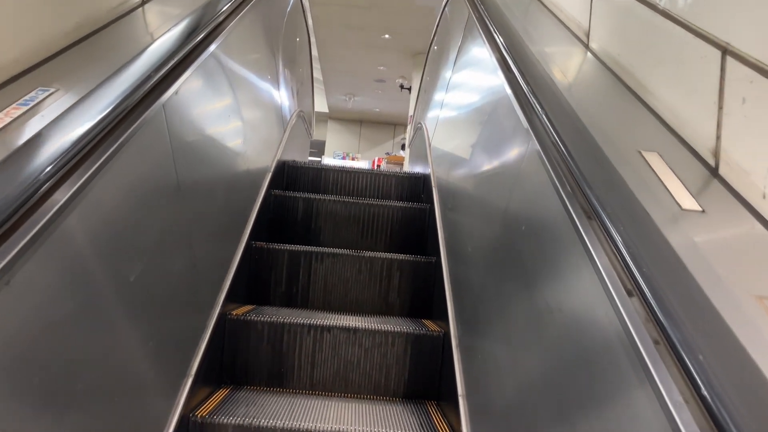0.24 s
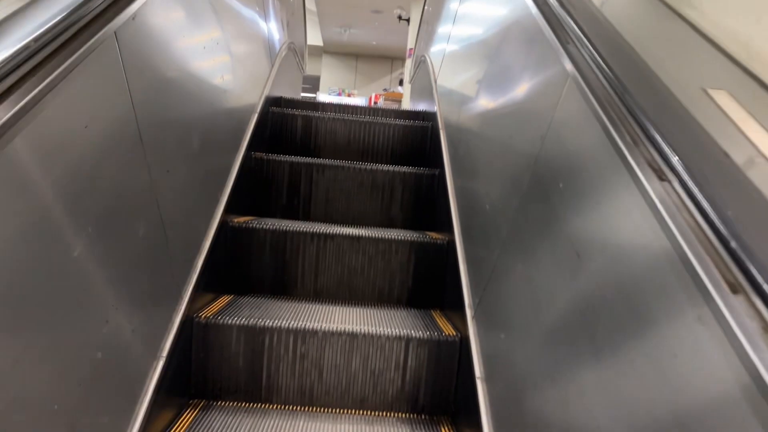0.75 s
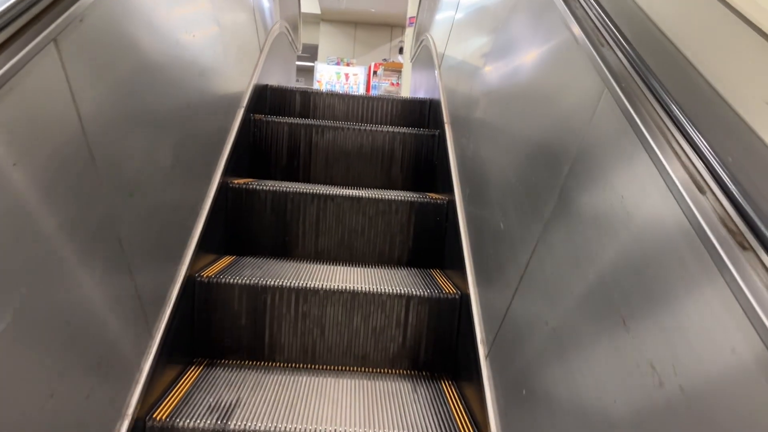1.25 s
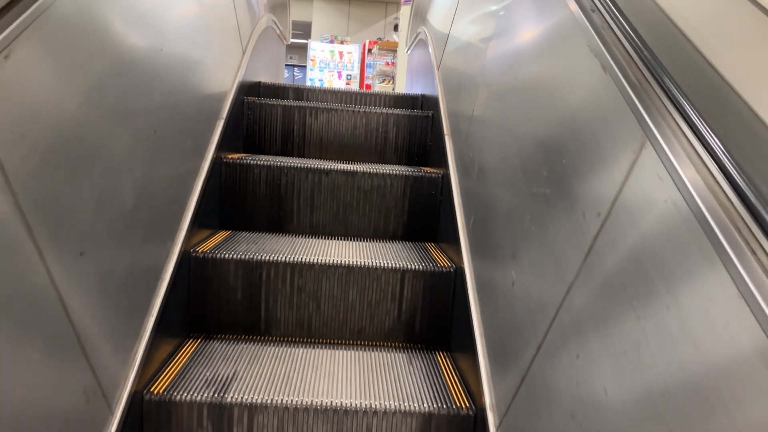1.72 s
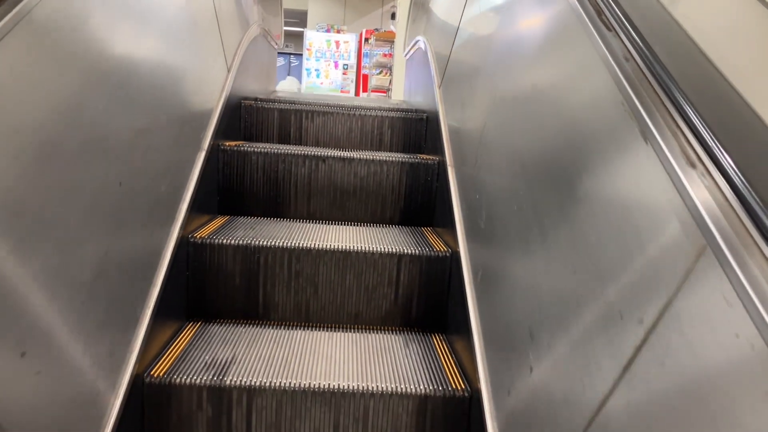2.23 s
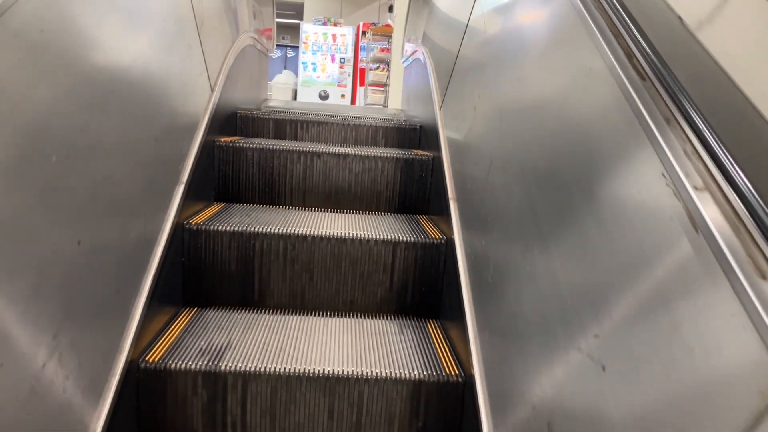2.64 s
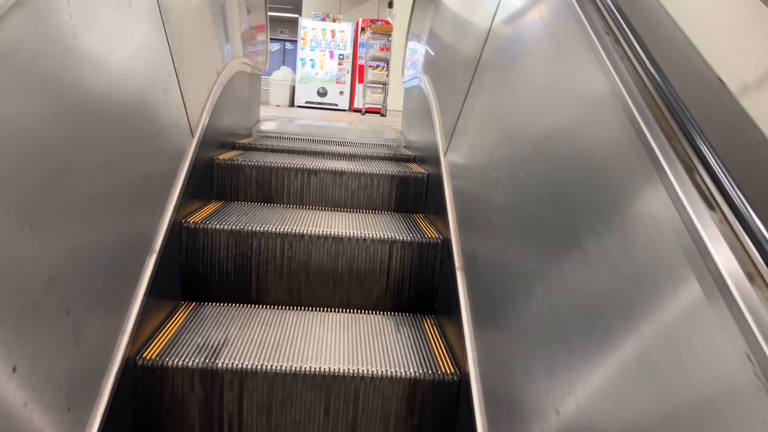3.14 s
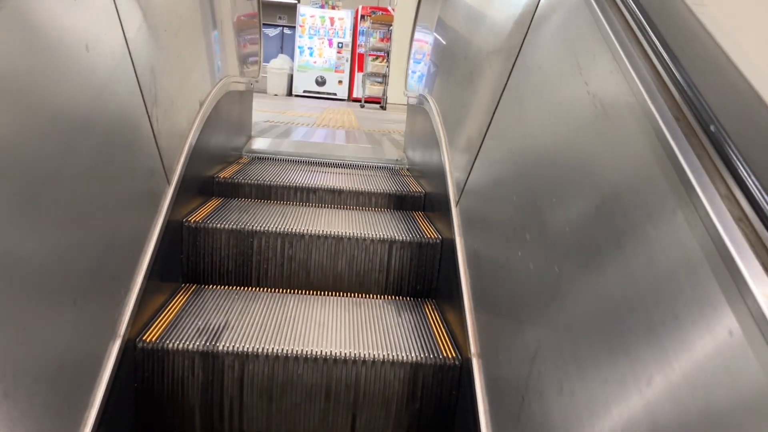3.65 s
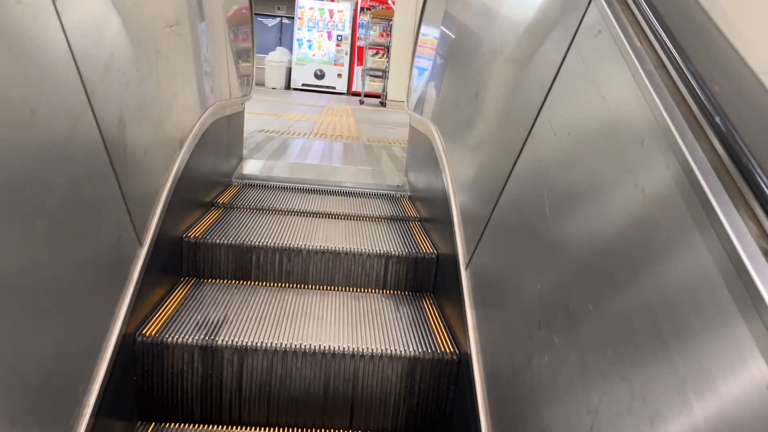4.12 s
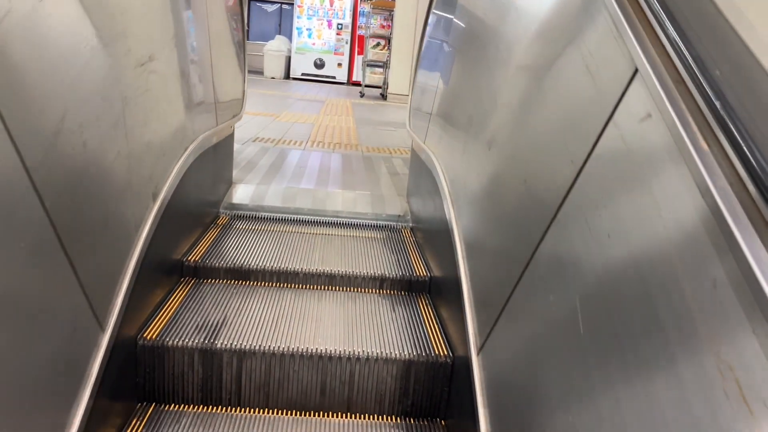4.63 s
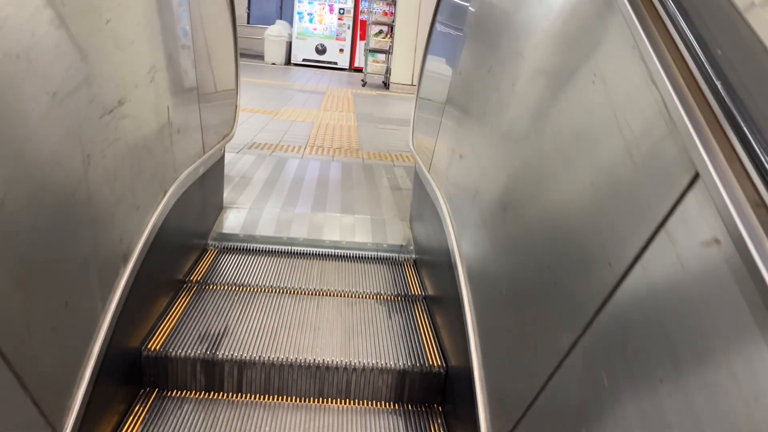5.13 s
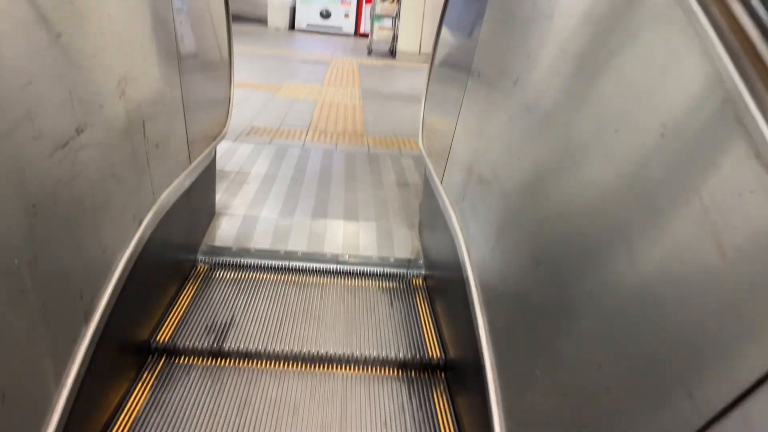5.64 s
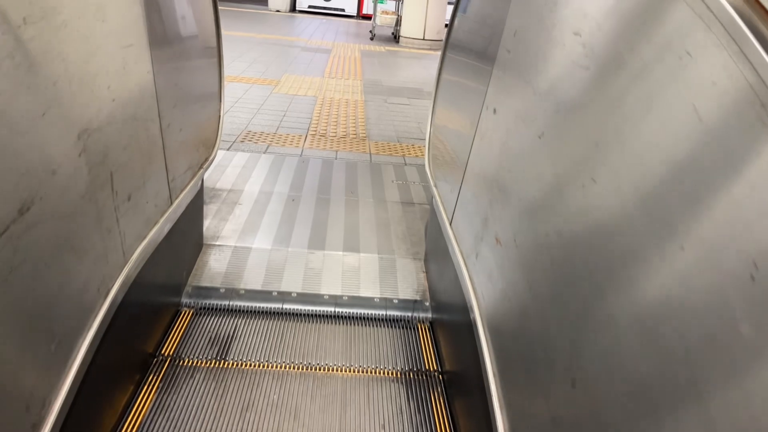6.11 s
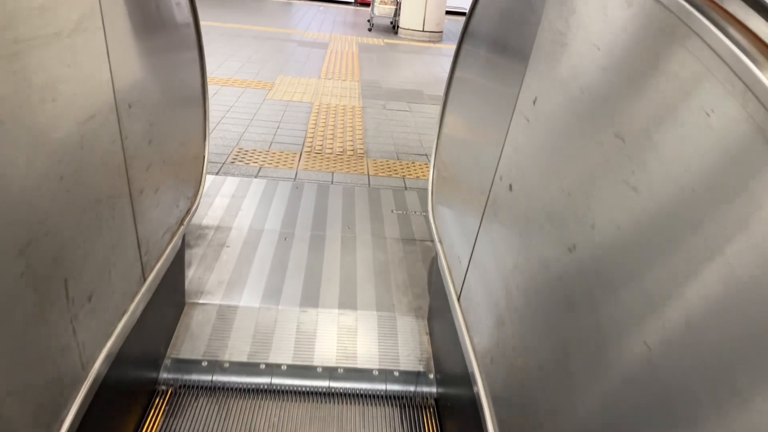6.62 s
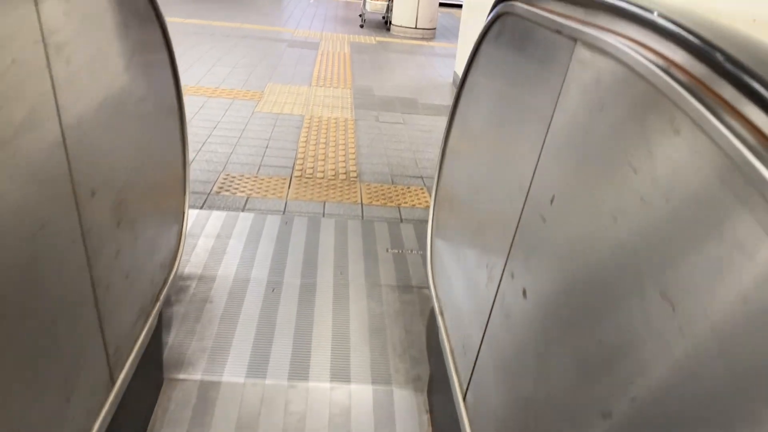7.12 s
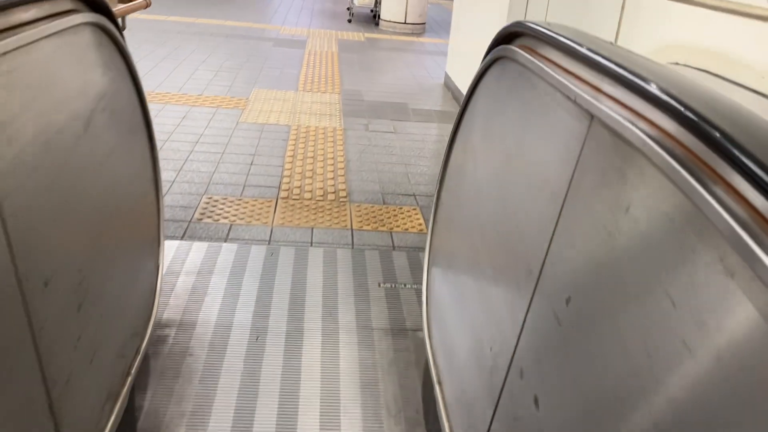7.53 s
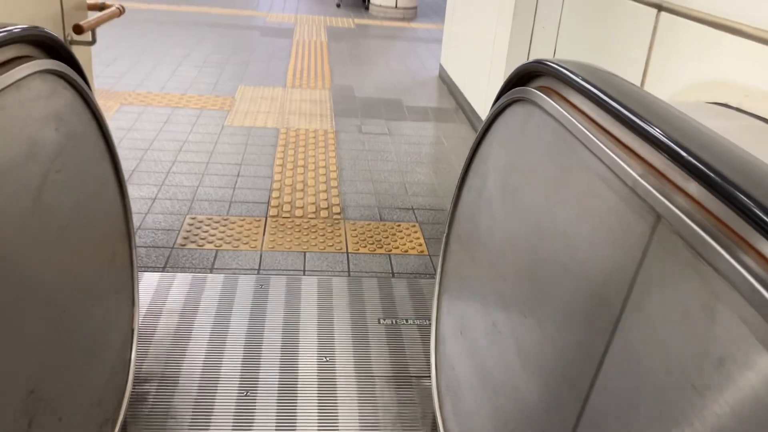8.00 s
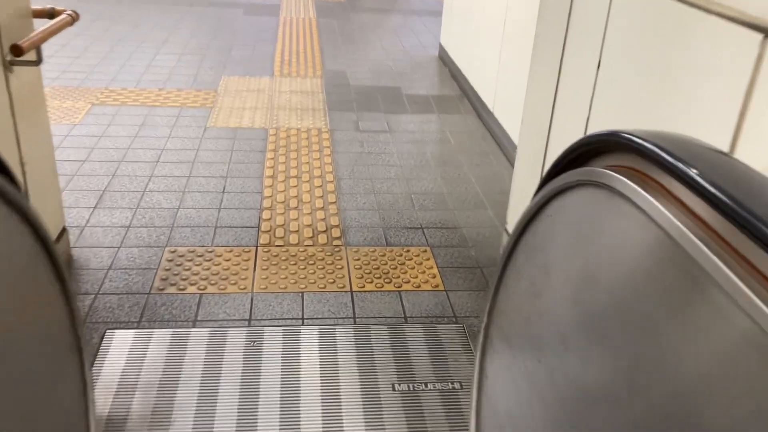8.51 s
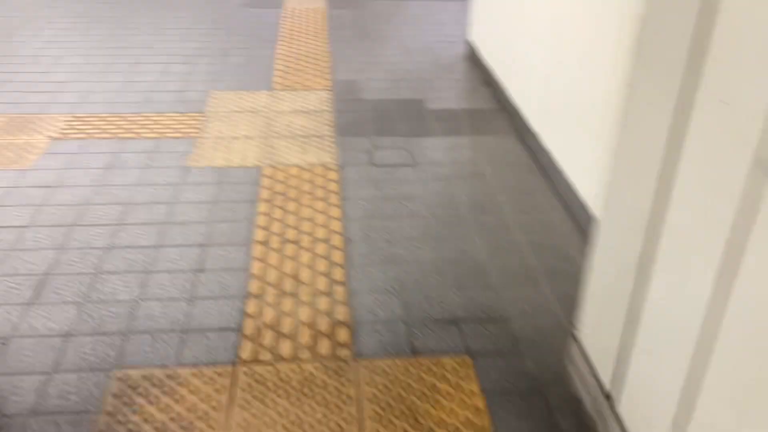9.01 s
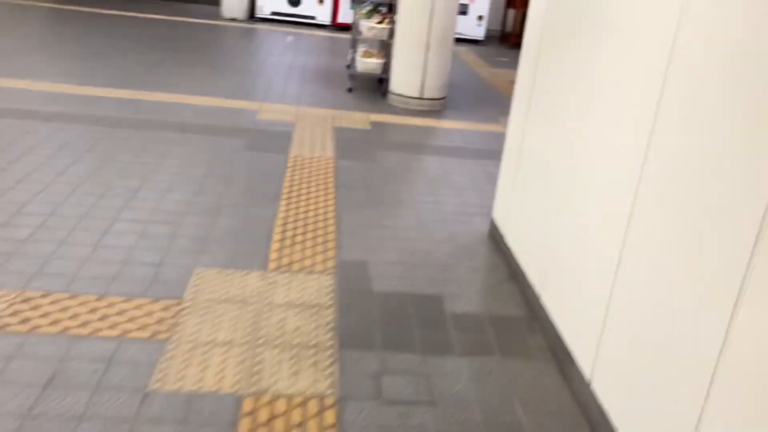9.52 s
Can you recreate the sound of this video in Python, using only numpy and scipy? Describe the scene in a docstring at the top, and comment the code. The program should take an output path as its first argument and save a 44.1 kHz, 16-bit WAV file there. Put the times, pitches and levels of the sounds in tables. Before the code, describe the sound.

A deep escalator rumble runs throughout, heard close by the rider and swelling a little more than once a second as the steps turn. Chain links clank lightly about seven times a second over a steady wash of rollers and thin microphone hiss. Steps land with uneven thuds and short booms, clearly at about 0.2, 2.8 and 3.6 seconds. Sharp metallic clicks stand out at 2.8 and 5.3 seconds. A faint drive whine grows from around 4 seconds. Soft, brief metal squeaks come between 6 and 7 seconds, and the heaviest thuds fall near 6.2, 7 and 7.9 seconds. A shoe swishes at about 8.4 seconds as the chain ticking fades. A hard, bright tap rings the landing plate at 8.7 seconds, with lighter taps and shoe scuffs from 9.2 to 9.5. The rumble eases slightly as the rider walks onto the tiled landing.

```python
"""A deep, thudding escalator rumble, as a rider goes up the last stretch and walks off onto a tiled landing.
The truss swells as each step turns at the top and booms as steps meet their tracks. Chain links clank
about seven times a second over a wash of rollers and a faint drive whine. Metal squeaks softly,
shoes scuff and the landing plate rings with hard taps. A two-port microphone adds its own hiss;
hiss and scuffs come inverted and late on the right."""
import sys
import numpy as np
from scipy import signal
from scipy.fft import rfft, irfft, next_fast_len
from scipy.io import wavfile
from scipy.ndimage import uniform_filter1d

SR = 44100
rng = np.random.default_rng(int(sys.argv[2]) if len(sys.argv) > 2 else 0)


def store_wav(level_fs):
    """Save 16-bit WAV to argv[1]."""
    pcm = np.round(np.clip(np.atleast_2d(level_fs), -1, 1) * 32767)
    wavfile.write(sys.argv[1], SR, pcm.T.astype(np.int16))


N = 429975
STEP_S = .8481  # time from one step turning over to the next

# Gains of the steady layers. Each row: time in seconds, then machine rumble, roller wash and
# microphone hiss in dB. The hiss swells with a shoe swish near 8.4 s.
BED_GAINS = [(0.0, -32, -42.5, -58.5), (0.9, -34, -43, -56.5), (1.6, -32.5, -43.5, -57),
             (2.4, -33.5, -42.5, -56), (3.3, -32.5, -43.5, -55), (4.0, -34, -43.5, -53.5),
             (4.9, -34.5, -42.5, -54), (5.8, -34, -43.5, -54.5), (6.4, -32, -44.5, -53.5),
             (7.0, -32, -43, -56.5), (7.6, -31.5, -45, -57.5), (7.9, -32, -43, -55.5),
             (8.25, -33, -44.5, -56.5), (8.44, -32, -44.5, -50.5), (8.7, -34.5, -44.5, -52.5),
             (9.15, -35, -44, -55), (9.75, -36, -47, -60)]
# Steps meeting their tracks. Each row: start in seconds, thud level in dB, thud centre in Hz,
# boom level in dB, boom pitch in Hz.
STEP_HITS = [(0.241, -18.5, 246, -22, 59.5), (0.31, -31.5, 215, -23.5, 75), (0.59, -29.5, 450, -39, 103),
             (0.609, -36, 253, -22.5, 97), (1.413, -23, 220, -28, 105), (1.441, -25, 284, -42, 110),
             (1.823, -31, 315, -30, 150), (2.249, -27.5, 234, -27, 159), (2.691, -38, 513, -30, 116),
             (2.778, -22, 243, -26, 58.7), (2.788, -19, 244, -32, 110), (2.905, -33, 253, -23, 59),
             (2.978, -22.5, 286, -28, 59), (3.512, -27.5, 335, -41, 59), (3.631, -17, 223, -22, 114),
             (3.978, -28.5, 233, -22.5, 120), (4.476, -24.5, 221, -28, 138), (4.538, -25, 284, -39, 123),
             (4.849, -27.5, 220, -24, 94), (5.241, -25, 310, -33, 85), (5.329, -21, 296, -22.5, 145),
             (5.333, -19.5, 330, -27, 65), (5.341, -18.5, 404, -32, 110), (5.518, -23, 180, -28, 75),
             (5.623, -22, 275, -27, 98), (5.668, -24, 286, -31, 147), (6.022, -29.5, 367, -28, 139.3),
             (6.166, -19, 201, -18, 116), (6.177, -15, 230, -31, 100), (6.191, -25, 200, -24, 131),
             (6.202, -24, 292, -30, 142), (6.222, -22, 250, -30, 121), (6.249, -33, 304, -34, 110),
             (6.489, -22.5, 360, -38, 108), (6.519, -22, 368, -37, 112), (6.699, -47, 354, -23, 100),
             (6.78, -28.5, 406, -27, 76.4), (6.924, -25.5, 220, -25.5, 136), (7.019, -14, 430, -35, 110),
             (7.029, -22, 230, -16.5, 109), (7.035, -21.5, 306, -18, 119), (7.36, -24.5, 221, -20, 96),
             (7.639, -23.5, 284, -29, 111), (7.77, -27, 367, -40, 98), (7.863, -16.5, 233, -15, 136),
             (7.897, -13.5, 237, -24, 92), (7.93, -19, 260, -24, 124), (7.96, -30, 327, -30, 125),
             (8.069, -26.5, 440, -33, 134), (8.209, -20.5, 315, -30, 151), (8.249, -21.5, 160, -29, 126),
             (8.728, -19.5, 400, -29, 130), (8.741, -24, 201, -17.5, 134.5), (8.813, -21, 210, -24.5, 129),
             (8.913, -20.5, 413, -26, 105), (9.019, -30.5, 390, -26, 139), (9.05, -25.5, 320, -23, 139),
             (9.419, -52, 226, -26.5, 64), (9.541, -27.5, 277, -32, 109), (9.588, -25, 282, -35, 116)]
# Resonances of truss and chain. Each row: pitch in Hz, level in dB, share of the ring time.
TRUSS_MODES = [(161.3, -6, 1.1), (185.7, -17, 2.1), (220, -3.5, 2.07), (227.1, -4.5, 1.44),
               (252.7, -4, 0.78), (285.1, -1.5, 1.53), (316, -1.5, 0.79), (332.8, -5, 1.45),
               (375.9, 0.5, 0.81), (396.4, -4, 1.24), (447, 3.5, 0.57), (522, -5, 0.56)]
LINK_MODES = [(638.7, 0.5, 1.7), (713, -1.5, 1.3), (751.3, -7.5, 1.9), (858.3, -3.5, 1.36), (925, -3, 1.26),
              (1028.6, -1, 0.86), (1151, -1.5, 0.6), (1222, -9, 1.8), (1396, -1.5, 0.14),
              (1420, -1.5, 0.72), (1600, -2, 0.83), (1814, -8, 1.5), (1904, -5.5, 0.39), (2164, 3, 0.48)]
# Stereo image of rumble and wash. Each row: frequency in Hz, left-right likeness (1 is mono).
LIKENESS = [(30, .995), (60, .98), (130, .93), (290, .82), (640, .38), (1400, .3), (3100, .05), (7000, .05)]
# Stereo balance. Each row: frequency in Hz, left minus right in dB.
BALANCE = [(60, -2.5), (300, -3), (1000, -3), (2500, -3.5), (5000, 0)]


def step_thuds():
    """A step meeting its track rings the truss."""
    return blows(STEP_HITS, TRUSS_MODES, t60=.35, narrow_db=19.5, rise_s=.0015, spread=.28, damp=.46)


def step_booms():
    """The weight of a settling step shoves the whole frame into a short, deep boom."""
    out, t = np.zeros(N), np.arange(SR // 3) / SR
    envelope = amp(-60 * t / .14) * (1 - np.exp(-t / .0019))
    for start, *_, db, hz in STEP_HITS:
        boom = np.sin(2 * np.pi * hz * t) * envelope
        add(out, start, amp(db) * boom / abs(boom).max())
    return out * amp([[-1.2], [1.2]])


def truss_rumble(first_step_s=.19, swell_db=3, rise_share=.14):
    """The truss rumbles up quickly as each step turns, then calms until the next."""
    # Each row: frequency in Hz, spectrum level in dB.
    spectrum = [(12, -34), (20, -10.5), (64, 3.5), (114, 3.5), (147, 2.5), (187, -4.5), (245, -1.5),
                (325, -8), (513, -32.5), (600, -29), (780, -26.5), (1320, -120)]
    turn = (np.arange(N) / SR - first_step_s) / STEP_S % 1
    swell = swell_db * np.minimum(turn / rise_share, (1 - turn) / (1 - rise_share))
    colour = humming(spectrum, TRUSS_MODES, lift_db=7.5, width_hz=3.45)
    rumble = noise(colour, lambda hz: at_hz(LIKENESS, hz), patchy_db=-.5, flicker_db=2, size=4096)
    return amp(curve(BED_GAINS, column=1) + swell) * rumble


def chain_clanks(first_link_s=.14, tick_hz=945):
    """The chain drops a link on the sprocket six times a step: faint ticks between clear clanks."""
    # Clanks of links and turning steps. Each row: start in seconds, level in dB, centre in Hz.
    clanks = [(0.246, -31, 630), (0.429, -34, 1230), (0.561, -38, 1100), (0.86, -34, 920),
              (0.993, -31, 910), (1.143, -34, 980), (1.809, -31.5, 1120), (1.84, -33.5, 664),
              (2.126, -26, 890), (2.275, -30, 830), (2.413, -38, 1110), (2.552, -36, 720),
              (2.63, -34, 1430), (2.687, -31.5, 930), (2.774, -29, 680), (2.783, -29, 800),
              (2.915, -33, 1400), (2.98, -29, 735), (3.125, -32.5, 1000), (3.259, -31.5, 915),
              (3.404, -25, 990), (3.466, -35, 1430), (3.51, -34, 1070), (3.54, -29, 1530),
              (3.545, -34, 920), (3.826, -35, 900), (3.966, -27.5, 720), (4.109, -32, 1010),
              (4.254, -31, 1220), (4.393, -33, 1130), (4.473, -32.5, 894), (4.531, -29.5, 915),
              (4.671, -25.5, 945), (4.818, -31, 806), (4.96, -35, 860), (5.103, -29.5, 1030),
              (5.233, -31, 1000), (5.3268, -19, 1010), (5.333, -29, 1190), (5.34, -29, 840),
              (5.348, -26.5, 694), (5.521, -26.5, 816), (5.675, -34, 845), (5.803, -36.5, 1540),
              (6.078, -30.5, 1070), (6.161, -24, 895), (6.162, -27, 1550), (6.177, -27.5, 1560),
              (6.233, -34, 980), (6.365, -30, 1160), (6.47, -33, 930), (6.51, -32, 950), (6.649, -31, 1060),
              (6.688, -31, 1020), (6.79, -36, 1300), (6.918, -31, 1060), (7.019, -25, 680),
              (7.029, -24.5, 1100), (7.045, -30, 790), (7.216, -31, 1080), (7.357, -29.5, 1140),
              (7.761, -35, 1010), (7.866, -33.5, 637), (8.043, -31.5, 1000), (8.202, -32, 776),
              (8.728, -30, 700), (8.746, -33, 1320), (8.756, -29, 790), (8.787, -25.5, 875),
              (8.838, -33.5, 770), (9.061, -29.5, 860), (9.241, -29, 760), (9.291, -35, 1290),
              (9.727, -36, 890)]
    # Uneven teeth: a gain in dB for each link, repeating every step.
    tooth_db = [-1.5, -1.5, -6, -7, -7.5, -23]
    # The ticking is strongest near the top. Each row: time in seconds, level in dB.
    nearness = [(0, -30), (1.5, -32.5), (2.2, -29), (4.5, -30), (7.3, -26), (8.3, -36), (9.75, -65)]
    starts = np.arange(first_link_s, N / SR, STEP_S / len(tooth_db))
    force, shift = rng.standard_normal((len(starts), 2)).T
    db = np.interp(starts, *np.transpose(nearness)) + np.resize(tooth_db, len(starts)) + 2 * force
    centre_hz = tick_hz * np.exp(.2 * shift)
    clear = abs(starts[:, None] - np.array(clanks)[:, 0]).min(1) > .03  # no tick on top of a clank
    ticks = list(zip(starts[clear], db[clear], centre_hz[clear]))
    return blows(clanks + ticks, LINK_MODES, t60=.11, narrow_db=20, rise_s=.00035, spread=.65, widen=.1)


def plate_taps():
    """Hard taps ring the landing plate, bright and brief."""
    # Each row: start in seconds, level in dB, centre in Hz.
    taps = [(0.745, -38, 3700), (2.781, -33, 4500), (2.782, -36, 6000), (2.7815, -36, 3300),
            (2.784, -32, 1890), (2.796, -31, 1900), (2.803, -31, 1860), (2.814, -34, 1880),
            (5.33, -40, 8700), (5.332, -34, 3190), (5.339, -36, 3190), (5.334, -38, 2300),
            (5.349, -36, 3550), (6.162, -37, 2000), (7.033, -43, 3400), (8.7445, -24, 4000),
            (8.745, -30, 5700), (8.7455, -33, 8700), (8.747, -32, 2300), (8.75, -32, 3700),
            (8.788, -32, 2100), (9.2405, -33.5, 3250), (9.241, -36, 4350), (9.257, -31, 2060),
            (9.284, -35, 2430), (9.289, -37, 4350), (9.291, -28.5, 1870)]
    # Each row: pitch in Hz, level in dB, share of the ring time.
    plate_modes = [(1880, -2, .6), (2100, -3, .7), (2420, -3, .7), (2800, -6, .9), (3190, -1, 1.3),
                   (3550, -3, .9), (3800, -4, .8), (4080, -1, .55), (4350, -4, .55), (4700, -3, .55),
                   (5100, -5, .7), (5550, -2, .7), (6000, -5, .7), (8700, -4, .35)]
    return blows(taps, plate_modes, t60=.07, narrow_db=24, rise_s=.0003, spread=.31)


def scuffs():
    """Grit, comb and shoes tick and scuff: sharp bursts of broad noise, partly alike on the two sides."""
    # Each row: start in seconds, level in dB, base decay time in seconds, brightest frequency in Hz.
    scrapes = [(.745, -39, .07, 6020), (1.819, -35, 0.087, 2390), (2.781, -30.5, 0.12, 6500),
               (5.076, -38, .06, 3400), (5.33, -37, 0.1, 2200), (5.614, -38, 0.1, 2200),
               (6.161, -33.5, .015, 13100), (6.164, -44, .1, 1670), (7.028, -31, .12, 2200),
               (8.744, -29, 0.038, 5500), (8.786, -28, 0.02, 8000), (8.789, -35, .05, 2000),
               (9.24, -34, 0.022, 6000), (9.26, -36, .06, 5900), (9.281, -37, 0.04, 5000),
               (9.289, -35, 0.03, 6000), (9.489, -40, .03, 7000), (9.521, -35.5, 0.054, 2200)]
    out, t = np.zeros((2, N)), np.arange(SR // 5) / SR
    hz = np.fft.rfftfreq(len(t), 1 / SR)
    for start, db, t60, bright_hz in scrapes:
        left, other = rng.standard_normal((2, len(t)))
        octaves = np.log2((hz + 30) / bright_hz)
        colour = amp(np.minimum(5 * octaves, -11 * octaves))
        burst = irfft(rfft([left, .6 * left + .8 * other]) * colour, len(t))
        burst *= amp(-60 * t / (t60 + .006)) * (1 - np.exp(-t / .0015))
        add(out, start, amp(db) * burst / abs(burst).max())
    return out


def squeaks():
    """Rubbing metal gives a soft, slightly rough tone that swells and fades."""
    # Each row: start in seconds, length in seconds, pitch in Hz, level in dB.
    rubs = [(6.1, 0.091, 877, -43), (6.71, 0.11, 840, -44), (6.922, 0.043, 963, -39)]
    out = np.zeros(N)
    for start, length, hz, db in rubs:
        t = np.arange(0, length, 1 / SR)
        wobble = .023 * unit_rms(uniform_filter1d(rng.standard_normal(SR // 5), size=300))[:len(t)]
        tone = np.sin(2 * np.pi * hz * np.cumsum(1 + wobble) / SR)
        add(out, start, amp(db) * np.sqrt(np.sin(np.pi * t / length)) * tone)
    return out * amp([[-1.5], [1.5]])


def roller_wash():
    """The rollers make a steady midrange wash, tinged with the chain's resonances."""
    # Each row: frequency in Hz, spectrum level in dB.
    spectrum = [(240, -13), (400, 2), (521, -3), (1390, -5), (2470, -15), (2750, -16.5), (4080, -20.5),
                (5510, -24), (6510, -26), (7000, -33), (9100, -74), (15400, -120)]
    colour = humming(spectrum, LINK_MODES, lift_db=2.5, width_hz=16.5)
    wash = noise(colour, lambda hz: at_hz(LIKENESS, hz), patchy_db=1.5, flicker_db=.5)
    return amp(curve(BED_GAINS, column=2)) * wash


def drive_whine():
    """Fuzzy whining tones that wander with the load, plus two broad bands that brighten the wash."""
    # Each row: centre in Hz, bandwidth in Hz, level in dB.
    bands = [(859, 64, -4), (1331, 13, -1), (1728, 17, -0.5), (1890, 14, -3), (1998, 22, 0), (2310, 270, 0),
             (2680, 60, -4.5), (2770, 26, -1.5), (2860, 75, -6.5), (3106, 460, -3.5), (3453, 41, -5.5)]
    # Louder near the top landing. Each row: time in seconds, gain in dB.
    nearness = [(0, -71), (2.5, -65), (4.2, -58.5), (5.3, -57), (6.5, -56), (7.2, -59), (8.2, -58),
                (9, -58.5), (9.75, -63)]
    out = np.zeros((2, N))
    load = unit_rms(uniform_filter1d(uniform_filter1d(rng.standard_normal(N), size=8000), size=8000))
    drive_time = np.cumsum(1 + .005 * load) / SR
    for hz, width_hz, db in bands:
        pole = np.exp(-np.pi * width_hz / SR)
        real, imag = rng.standard_normal((2, 2, N))
        fuzz = signal.lfilter([1 - pole], [1, -pole], real + 1j * imag)
        out += amp(db) * unit_rms((fuzz * np.exp(2j * np.pi * hz * drive_time)).real)
    return out * amp(curve(nearness) + 1.6 * load)


def microphone_hiss():
    """The microphone's own thin, faintly flickering hiss; one brief swell makes a shoe swish."""
    # Each row: frequency in Hz, spectrum level in dB.
    spectrum = [(3000, -13), (5000, -9.5), (7000, 1), (9500, -4.5), (12000, -3.5), (14000, -12.5),
                (16000, -7)]
    hiss = noise(lambda hz: at_hz(spectrum, hz), lambda hz: np.full_like(hz, .998),
                 patchy_db=.8, flicker_db=.6)
    return amp(curve(BED_GAINS, column=3)) * hiss


def reflections(pair, t60, wet_db):
    """Steel side panels and tiles return sparse echoes of random sign, each side its own."""
    grid = np.arange(200, SR // 2, 20)
    lags = grid + rng.integers(0, 20, (2, len(grid)))
    echoes = np.zeros((2, SR // 2 + 20))
    np.put_along_axis(echoes, lags, rng.choice([-1., 1.], lags.shape) * amp(-60 * lags / SR / t60), 1)
    echoes /= np.linalg.norm(echoes[0])
    return pair + amp(wet_db) * signal.oaconvolve(pair, echoes, axes=1)[:, :N]


def microphone_ports(body, treble):
    """The right port hears the body a little late, the treble later and inverted, which combs the sum."""
    right = delayed(body[1], lag_s=.00012) - delayed(treble[1], lag_s=.0003085)
    return np.array([body[0] + treble[0], right])


def blows(events, modes, t60, narrow_db, rise_s, spread, widen=0, damp=.05):
    """Struck metal rings most in the modes near the blow's centre; each side hears another phase."""
    out = np.zeros((2, N))
    hz, mode_db, share = np.transpose(modes)[:, :, None]
    t = np.arange(round(1.3 * t60 * SR)) / SR
    scatter = rng.standard_normal((len(events), 4, len(modes), 1))
    scatter *= np.reshape([.022, .6, 1, 1.5], (4, 1, 1))
    for (start, db, centre_hz, *_), (detune, phase, skew, vary_db) in zip(events, scatter):
        softness_db = -30 - db  # below a usual blow
        # Harder blows reach more modes (widen) and seat the parts tightly, ringing shorter (damp).
        off_centre_db = abs(narrow_db * amp(widen * softness_db) * np.log2(hz / centre_hz))
        ring_s = t60 * amp(damp * softness_db) * share + .0079
        level = amp(mode_db - off_centre_db + vary_db - 60 * t / ring_s)
        angle = 2 * np.pi * hz * (1 + detune) * t + phase
        side = np.reshape([1, -1], (2, 1, 1))
        ring = (level * amp(side * at_hz(BALANCE, hz) / 2) * np.sin(angle + side * spread * skew)).sum(1)
        ring *= (1 - np.exp(-t / rise_s)) * (1 - (t / t[-1]) ** 4)
        add(out, start, amp(db) * ring / abs(ring.mean(0)).max())
    return out


def humming(spectrum, modes, lift_db, width_hz):
    """Rolling keeps the metal ringing: the noise peaks at the strong modes and dips at the weak ones."""
    return lambda hz: at_hz(spectrum, hz) + sum(
        (lift_db + db) / (1 + ((hz - mode_hz) / width_hz) ** 2) for mode_hz, db, _ in modes)


def noise(colour_db, likeness, patchy_db, flicker_db, size=1024):
    """Coloured stereo noise with drifting patches in its spectrum and an overall flicker."""
    hop = size // 4
    frames, hz = N // hop + 5, np.fft.rfftfreq(size, 1 / SR)
    left_re, left_im, other_re, other_im, patches = rng.standard_normal((frames, len(hz), 5)).T
    patches = uniform_filter1d(patches, size=6, axis=0)
    patches = unit_rms(uniform_filter1d(patches, size=3072 // hop, axis=1))
    flicker = unit_rms(uniform_filter1d(rng.standard_normal(frames), size=1536 // hop + 1))
    alike, left = likeness(hz)[:, None], left_re + 1j * left_im
    right = alike * left + np.sqrt(1 - alike ** 2) * (other_re + 1j * other_im)
    db = colour_db(hz)[:, None] + patchy_db * patches + flicker_db * flicker
    pan_db = at_hz(BALANCE, hz)[:, None] / 2
    spectra = np.array([left * amp(db + pan_db), right * amp(db - pan_db)])
    out = signal.istft(spectra, nperseg=size, noverlap=size - hop)[1][:, :N]
    return out / np.sqrt(np.mean(out.mean(0) ** 2))


def amp(db):
    return 10 ** (np.asarray(db) / 20)


def unit_rms(x):
    return x / np.sqrt(np.mean(x ** 2) + 1e-20)


def at_hz(points, hz):
    point_hz, value = np.transpose(points)
    return np.interp(np.log(hz + 1), np.log(point_hz + 1), value)


def curve(rows, column=1):
    rows = np.array(rows)
    return np.interp(np.arange(N) / SR, rows[:, 0], rows[:, column])


def add(mix, start_s, sound):
    part = mix[..., round(start_s * SR):][..., :sound.shape[-1]]
    part += sound[..., :part.shape[-1]]


def delayed(x, lag_s):
    size = next_fast_len(N + 64)
    return irfft(rfft(x, size) * np.exp(-2j * np.pi * np.fft.rfftfreq(size, 1 / SR) * lag_s), size)[:N]


def scene():
    """A bed of rumble, wash and hiss under the blows of steps, chain and shoes."""
    rumble, wash, hiss = truss_rumble(), roller_wash(), microphone_hiss()
    thuds = step_thuds() + step_booms()
    clatter = reflections(chain_clanks() + plate_taps(), t60=.44, wet_db=-15)
    treble = hiss + reflections(scuffs(), t60=.07, wet_db=-3.5)
    body = rumble + wash + drive_whine() + squeaks() + thuds + clatter
    return microphone_ports(body, treble)


def record(dry, low_cut_hz=30.6, high_cut_hz=15760):
    """The microphone loses the deepest bass, and a steep filter takes off the very top."""
    thinned = signal.sosfilt(signal.butter(3, low_cut_hz, "high", fs=SR, output="sos"), dry)
    high_cut = signal.firwin(1023, high_cut_hz, window=("kaiser", 10), fs=SR)
    return signal.oaconvolve(thinned, high_cut[None], "same")


dry = scene()
out = record(dry)
store_wav(out)
```